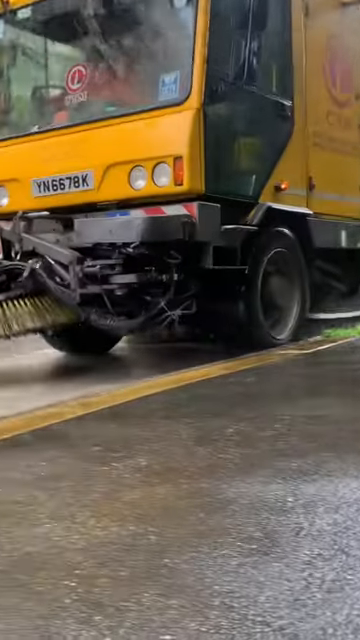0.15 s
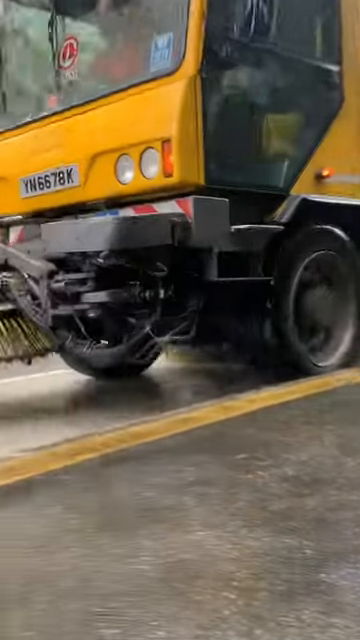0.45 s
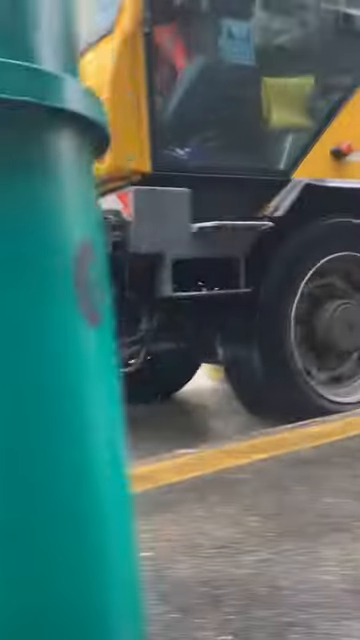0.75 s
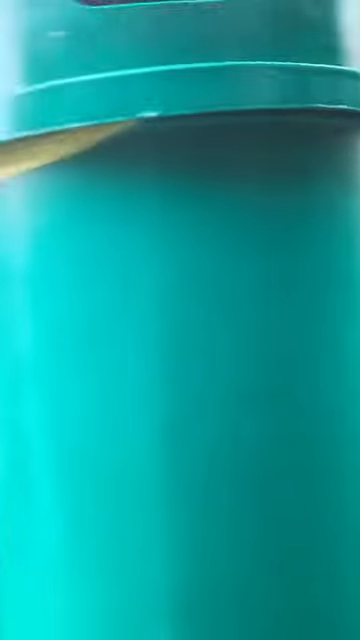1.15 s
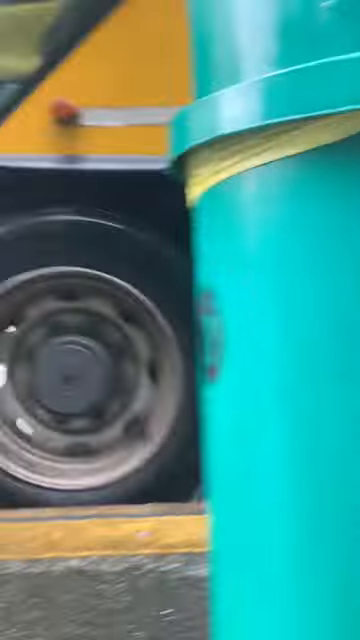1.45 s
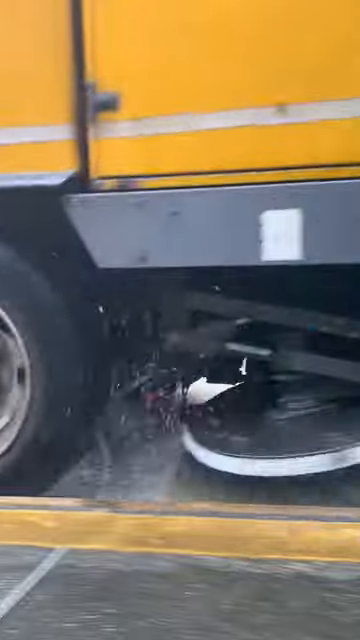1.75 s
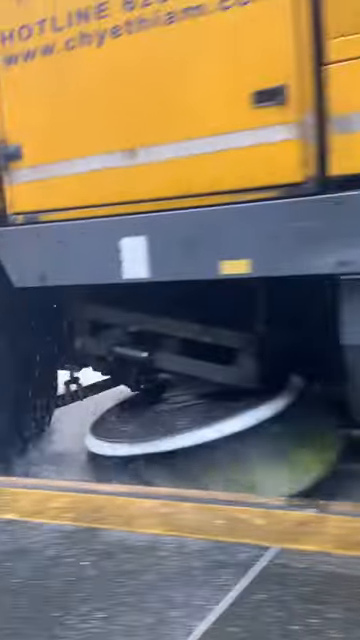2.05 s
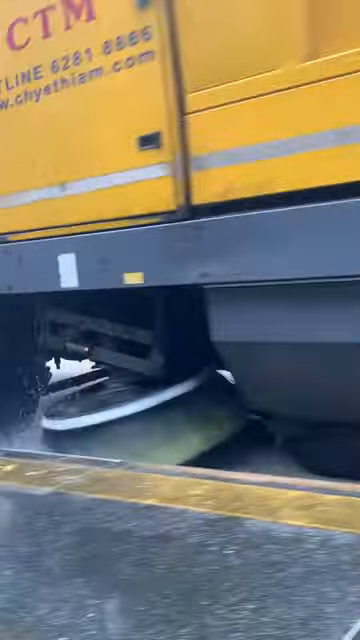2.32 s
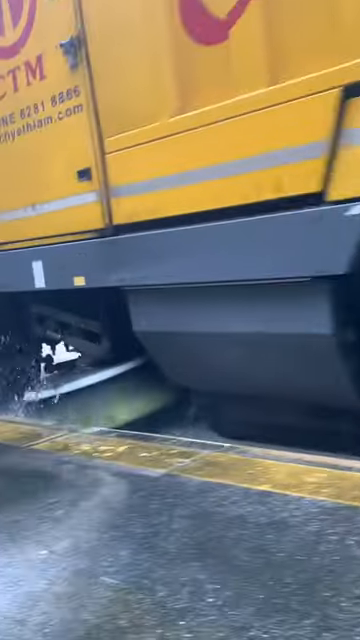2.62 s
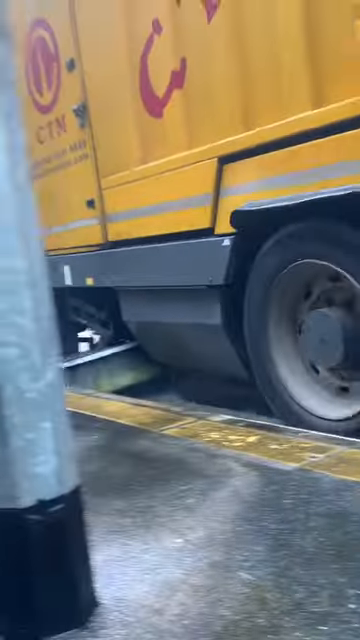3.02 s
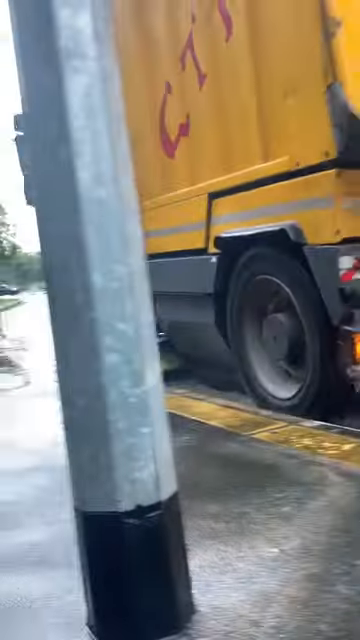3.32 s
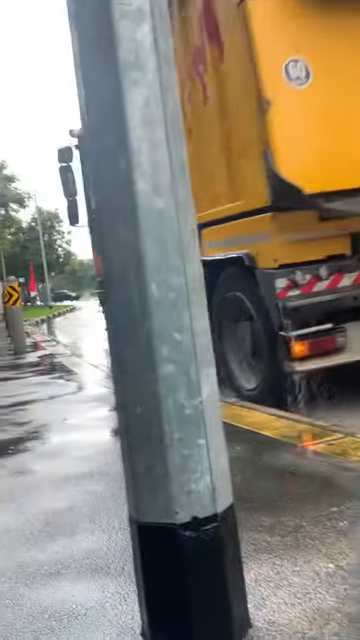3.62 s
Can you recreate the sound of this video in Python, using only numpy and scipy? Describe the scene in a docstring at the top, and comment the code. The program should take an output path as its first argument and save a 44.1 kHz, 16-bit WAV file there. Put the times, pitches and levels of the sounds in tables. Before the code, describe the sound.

A street sweeper truck rolls past on wet road, hissing brushes and spray over diesel drone.

```python
"""Passing street sweeper

A street sweeper truck rolls slowly past on a wet road, heard from the pavement in two channels.
Its six-cylinder diesel is a harmonic series on the cycle rate; the suction fan is a wavering tone, narrow bands
and broad flow noise; brushes and spray are dense ticks over smooth noise, filtered into treble bands.
A bin shades the treble for a moment and throws hiss back; then the truck draws away and its levels sink.
"""
import sys
import numpy as np
from scipy import signal
from scipy.fft import rfft, irfft, next_fast_len
from scipy.io import wavfile

SR = 44100
rng = np.random.default_rng(int(sys.argv[2]) if len(sys.argv) > 2 else 0)


def master_out(mix):
    """Clip the mix to full scale and print it as 16-bit PCM to the path in sys.argv[1]."""
    frames = np.transpose(np.atleast_2d(mix))
    ceiling = np.clip(frames, -1, 1)
    pcm = np.round(ceiling * 32767).astype(np.int16)
    wavfile.write(sys.argv[1], SR, pcm)


N = 166698   # samples

# Engine firing, sagging a little in pitch as the truck goes by:
# (time [s], firing rate [Hz], level of the firing tone [dB])
ENGINE_FIRING = [(0, 95.3, -34), (.4, 95.2, -34.5), (.75, 95.15, -37), (1.1, 95.05, -34), (1.4, 95, -32.5),
                 (1.75, 94.9, -33), (2.1, 94.8, -31.5), (2.7, 94.5, -33), (3.3, 94.3, -37),
                 (3.78, 94.3, -36.5)]
# Exhaust harmonics: (multiple of the cycle rate [-], level re the firing tone [dB], slow waver [dB])
EXHAUST_TONES = [(3, -29, 3.5), (4, -21.5, 6.5), (5, -33, 3), (6, 0.5, 1.0), (7, -15, 6), (8, -17.5, 4),
                 (9, -13.5, 3.5), (11, -17, 4.5), (13, -19.5, 2), (14, -15, 1), (15, -15, 2.5),
                 (18, -22, 7), (20, -18, 4.5), (22, -16.5, 2.5), (26, -28.5, 1.5), (33, -26, 1),
                 (36, -20.5, 3.5)]
# Harmonics that swell on their own: (multiple of the cycle rate [-])
SWELLING_MULTIPLES = (10, 12, 24)
# Tones that swell as the paths to the pavement change: (time [s], 10th multiple level [dB],
# 12th multiple level [dB], fan hum level [dB], 24th multiple level [dB])
TONE_SWELLS = [(0, -40, -31.5, -38, -49), (.15, -46, -38, -39, -43), (.3, -53, -33.5, -48, -49),
               (.42, -41, -39, -32, -38), (.6, -40, -42, -51, -46), (.8, -41, -41.5, -46, -56),
               (1.0, -46, -40, -54, -55), (1.2, -46, -46, -46, -49), (1.5, -47, -37.5, -42.5, -49),
               (1.7, -51, -39, -45, -40), (1.85, -54, -50, -35, -44), (2.0, -47, -52, -42.5, -41),
               (2.2, -42, -42, -42, -44), (2.4, -45, -41.5, -53.5, -49), (2.6, -40.5, -40.5, -51, -46),
               (2.8, -45, -42, -45.5, -54), (3.1, -41, -45, -60, -51), (3.35, -48, -40, -52, -49),
               (3.78, -49, -45, -54, -62)]
# Faint upper tones as narrow bands, before the passing gain; 760 Hz is the engine's 48th cycle multiple,
# broadened: (frequency [Hz], rms level [dB], width [Hz])
UPPER_NARROW_TONES = [(760, -53, 22), (1147, -55, 16)]
# Hollow band that slides in pitch: (time [s], centre frequency [Hz], level [dB])
HOLLOW_BAND = [(0, 1150, -47), (.65, 1130, -53), (.8, 1164, -36.5), (.95, 1270, -37.5), (1.1, 1383, -42),
               (1.25, 1410, -40), (1.35, 1420, -47), (2.9, 1250, -62), (3.15, 1195, -43), (3.35, 1130, -45),
               (3.55, 1170, -41), (3.78, 1160, -54)]
# Noise levels as the truck passes: (time [s], body rumble [dB], suction roar [dB], intake whoosh [dB],
# duct ring [dB], brush hiss [dB], spray [dB], fine mist [dB])
PASSING_LEVELS = [(0, -32, -30, -31.2, -30, -28, -24.5, -24),
                  (0.25, -31, -30.2, -30, -31.5, -26, -22, -23.5),
                  (0.55, -30, -29, -31.5, -34, -28, -22.5, -22.5),
                  (0.68, -34, -31, -33, -37, -30.5, -26, -27),
                  (0.85, -33.5, -30.5, -34.5, -35.5, -31.5, -26.5, -28.6),
                  (1.05, -32.5, -30.5, -32, -34, -29.5, -25, -25.5),
                  (1.25, -35.5, -32, -36, -35, -32, -28, -28.5),
                  (1.36, -31, -34.5, -39, -39, -34.5, -31.5, -32),
                  (1.43, -35.5, -35.5, -37, -37, -33.5, -31, -35),
                  (1.52, -34, -32.5, -35, -34.5, -29.5, -28, -30),
                  (1.62, -31.5, -31.5, -34.5, -34.5, -26, -24, -23.5),
                  (1.8, -34, -31, -33.5, -36, -28, -25.5, -25),
                  (2.05, -34, -31.5, -33.5, -35, -29.5, -27.5, -28),
                  (2.2, -34, -33, -36.5, -37, -29.5, -28.5, -28.5),
                  (2.45, -37, -33.5, -34, -35, -31.5, -27.5, -29),
                  (2.7, -38, -34, -36, -33, -31, -29.5, -31.5),
                  (2.95, -35.5, -36, -39, -33, -34, -30, -33.4),
                  (3.15, -37, -37.5, -39.5, -38.5, -36, -32, -37),
                  (3.4, -36, -37.5, -39.5, -38.5, -36.5, -33.5, -35),
                  (3.6, -40, -36.5, -46, -38, -36.5, -37.5, -37),
                  (3.78, -37.5, -38.5, -43.5, -43.5, -39, -37.2, -42)]
# Body panels' drone: (time [s], level [dB])
PANEL_LEVEL = [(0, -37), (.15, -34), (.45, -36), (.62, -35.5), (.8, -38), (1.15, -38.5), (1.45, -38.5),
               (1.7, -34.5), (1.95, -35.5), (2.2, -37), (2.5, -39.5), (2.8, -42), (3.15, -43.5),
               (3.4, -44.5), (3.6, -43.5), (3.78, -48)]
# Relative spectra of the noises, each: (frequency [Hz], spectral density [dB per Hz])
ROAR_SPECTRUM = [(700, -12), (950, -13), (1100, -4), (1300, -2), (1700, 0.5), (2100, -0.5), (2600, -8),
                 (3300, -16.5)]
WHOOSH_SPECTRUM = [(1900, -12), (2350, -0.5), (2700, 1.5), (3050, -0.5), (3350, 3.5), (3900, -60)]
DUCT_SPECTRUM = [(3000, -54), (3500, -0.5), (3950, 2.5), (4300, 0), (4700, -14), (5500, -91)]
HISS_SPECTRUM = [(4000, -10), (4650, -3), (5200, -4), (6200, 1.5), (6800, -0.5), (7300, 0.5), (8200, 0),
                 (9200, -9.5)]
SPRAY_SPECTRUM = [(7800, -17), (8500, -3.5), (9300, 0), (10300, 1.5), (10900, 2), (11500, 1), (12500, -18)]
MIST_SPECTRUM = [(11000, -21), (11900, -2), (13000, -2.5), (14000, -2), (15000, -8.5), (16000, -1)]
DISC_SPECTRUM = [(1150, -19), (1450, -4), (1650, -2), (1850, -5), (2300, -25)]
RUMBLE_SPECTRUM = [(18, -32), (25, -20), (35, -14), (48, -0.5), (110, -2), (230, -2.5), (400, -5),
                   (520, -8.5), (700, -22)]
PANEL_SPECTRUM = [(420, -14), (560, -1.5), (750, -1.5), (950, -3), (1150, -6.5), (1500, -22)]
THROWN_SPECTRUM = [(4300, -24), (4700, 0), (5600, 4), (6000, -18)]
# Bearing of the intake: (time [s], extra phase of the right channel [half turns])
INTAKE_BEARING = [(0, 0.12), (.7, 0.086), (1.4, -0.21), (1.7, -0.44), (2.3, -.55), (2.8, -0.0034),
                  (3.78, -0.092)]
# Left-right likeness by frequency: (frequency [Hz], likeness 0-1 [-], phase of the right channel [half turns])
CHANNEL_LIKENESS = [(20, .995, 0.0), (350, .985, 0.0), (700, .84, -.03), (1100, .7, .03), (1500, .9, .04),
                    (1900, .97, 0.0), (2500, .45, -.3), (3200, .45, -.6), (4300, .35, -.4),
                    (4800, .9, -.97), (5000, .98, -1), (5450, .96, -1), (5900, .68, -1.3),
                    (7200, .78, -1.8), (7700, .998, -2), (8950, .998, -2), (9700, .8, -2.3),
                    (11200, .85, -2.75), (11800, .998, -3), (13200, .998, -3), (14000, .72, -3.4),
                    (14800, .72, -3.75), (15250, .998, -4), (17000, .998, -4)]
# Balance of the channels: (frequency [Hz], left minus right level [dB])
CHANNEL_TILT = [(60, -2), (110, -1.0), (200, -2.5), (380, -1.5), (700, 0.5), (1290, 1), (2380, -1),
                (4400, -0.5), (8120, 0.0), (15000, -0.5)]

CYLINDERS = 6   # firings per engine cycle
UPPER_FROM = 12   # exhaust tones in EXHAUST_TONES from this multiple up follow the body rumble's level
TONE_WAVER_HZ = 1.94
FIRING_ROUGH, FIRING_ROUGH_HZ = .04, 9   # unevenness of the firings: share, speed
FAN_HZ, FAN_WANDER_HZ = 294.5, 4   # mean pitch, spread of its wander
HOLLOW_WIDTH_HZ = 120
BRISTLES_PER_S, BRISTLE_SPREAD_DB, BRISTLE_SHARE = 9000, 1.5, .32   # share of the power in ticks
SPURT_DB, SPURT_HZ = .35, 14   # spread and speed of the water's spurts
DISC_DB, DISC_THROB_DB = -38.5, 5.5   # mean level and swing either way
DISC_TURNS_HZ, DISC_PEAK_S = 4.34, 1.93
DISC_NEAR_S, DISC_NEAR_WIDTH_S = 2.07, .49
THROWN_DB, THROWN_S, THROWN_WIDTH_S = -41, 1.054, .16
CUTOFF_HZ = 15740


def engine(near_db):
    """Harmonic series: uneven cylinders sound multiples of the cycle rate, wavering as the paths change."""
    firing_hz, firing_db = in_time(ENGINE_FIRING)
    tenth_db, twelfth_db, _, top_db = in_time(TONE_SWELLS)
    cycles = np.cumsum(firing_hz) / SR / CYLINDERS

    def harmonic(multiple, level_db):
        return np.sqrt(2) * amp(level_db) * np.sin(2 * np.pi * (multiple * cycles + rng.random()))

    tones = np.zeros(N)
    for multiple, level_db in zip(SWELLING_MULTIPLES, (tenth_db, twelfth_db, top_db)):
        tones += harmonic(multiple, level_db)
    for multiple, relative_db, waver_db in EXHAUST_TONES:
        base_db = firing_db if multiple < UPPER_FROM else firing_db.mean() + near_db
        tones += harmonic(multiple, base_db + relative_db + waver_db * drift(TONE_WAVER_HZ))
    return tones * (1 + FIRING_ROUGH * drift(FIRING_ROUGH_HZ))


def fan_hum(near_db):
    """Frequency and amplitude modulation broaden the fan's main tone; narrow noise bands lie above it."""
    pitch_hz = FAN_HZ + FAN_WANDER_HZ * drift(3.18)
    wobble = 1 + .3 * drift(6.0)
    main_db = in_time(TONE_SWELLS)[2]
    main = amp(main_db) * np.sqrt(2) * wobble * np.sin(2 * np.pi * np.cumsum(pitch_hz) / SR)
    upper = sum(amp(db) * narrow(hz, width_hz) for hz, db, width_hz in UPPER_NARROW_TONES)
    hollow_hz, hollow_db = in_time(HOLLOW_BAND)
    return main + amp(near_db) * upper + amp(hollow_db) * narrow(hollow_hz, HOLLOW_WIDTH_HZ)


def suction_roar(level_db):
    """Flow noise: chance pressure fluctuations form a broad band that swells unevenly."""
    return amp(level_db) * coloured(white(), ROAR_SPECTRUM, slow_db=.1, fast_db=2.0, count=7)


def intake(whoosh_db, duct_db):
    """Phase rotation: whoosh and duct ring take a moving extra phase in the right channel."""
    whoosh = amp(whoosh_db) * coloured(white(), WHOOSH_SPECTRUM, slow_db=1.8, fast_db=2.5, count=8)
    duct = amp(duct_db) * coloured(white(), DUCT_SPECTRUM, slow_db=1.0, fast_db=.5, count=8)
    left, right = stereo(*(whoosh + duct))
    analytic = signal.hilbert(right, next_fast_len(N))[:N]
    turn = np.exp(1j * np.pi * in_time(INTAKE_BEARING)[0])
    return np.array([left, np.real(analytic * turn)])


def brush_and_spray(hiss_db, spray_db, mist_db):
    """Shot noise: impacts of bristles and droplets fill three treble bands that share the water's spurts."""
    spurt = amp(SPURT_DB * drift(SPURT_HZ))
    hiss = amp(hiss_db) * coloured(bristles(), HISS_SPECTRUM, slow_db=-.2, fast_db=1.98, count=9)
    spray = amp(spray_db) * coloured(bristles(), SPRAY_SPECTRUM, slow_db=.6, fast_db=.4, count=10)
    mist = amp(mist_db) * coloured(bristles(), MIST_SPECTRUM, slow_db=.5, fast_db=.4, count=10)
    return spurt * (hiss + spray + mist)


def bristles():
    """Random superposition: dense ticks of either sign and uneven size over smooth spray noise."""
    size_db = BRISTLE_SPREAD_DB * np.minimum(rng.exponential(1, (2, N)), 5)
    sizes = amp(size_db) * rng.choice([-1, 1], (2, N))
    ticks = rms_one(sizes * (rng.random((2, N)) < BRISTLES_PER_S / SR))
    return np.sqrt(BRISTLE_SHARE) * ticks + np.sqrt(1 - BRISTLE_SHARE) * white()


def brush_disc():
    """Periodic modulation: the side brush's disc rings in the scrub once a turn while it is near."""
    t = np.arange(N) / SR
    throb_db = DISC_THROB_DB * np.cos(2 * np.pi * DISC_TURNS_HZ * (t - DISC_PEAK_S))
    level = amp(DISC_DB + throb_db) * flat_topped(DISC_NEAR_S, DISC_NEAR_WIDTH_S)
    return level * coloured(bristles(), DISC_SPECTRUM, slow_db=1.0, fast_db=2.5, count=6)


def body(rumble_db):
    """Structural radiation: low body rumble and the panels' drone, as two bands of filtered noise."""
    rumble = amp(rumble_db) * coloured(white(), RUMBLE_SPECTRUM, slow_db=.5, fast_db=2.3, count=3)
    panel_db = in_time(PANEL_LEVEL)[0]
    return rumble + amp(panel_db) * coloured(white(), PANEL_SPECTRUM, slow_db=2.0, fast_db=3.0, count=6)


def bin_reflection():
    """Reflection: hiss thrown back by the bin swells briefly, alike in both channels."""
    hiss = coloured(white(), THROWN_SPECTRUM, slow_db=1.0, fast_db=2.5, count=6)[0]
    return amp(THROWN_DB) * flat_topped(THROWN_S, THROWN_WIDTH_S) * hiss


def stereo(direct, diffuse):
    """Partial coherence: the right channel is the left's sound turned in phase, plus an unrelated part."""
    size = next_fast_len(N + 4096)
    hz = np.arange(size // 2 + 1) * SR / size + 1e-3
    at, likeness, half_turns = np.transpose(CHANNEL_LIKENESS)
    alike = np.clip(np.interp(hz, at, likeness), 0, 1)
    turn = np.exp(1j * np.pi * np.interp(hz, at, half_turns))
    tilt_hz, tilt_db = np.transpose(CHANNEL_TILT)
    lean = amp(np.interp(np.log(hz), np.log(tilt_hz), tilt_db) / 2)   # half the difference to each channel
    shared, unrelated = rfft(direct, size), rfft(diffuse, size)
    left = shared * lean
    right = (alike * shared + np.sqrt(1 - alike ** 2) * unrelated) * turn / lean
    return irfft([left, right], size)[:, :N]


def coloured(raw, spectrum, slow_db, fast_db, count):
    """Spectral shaping: filter a pair of sounds; count bands an octave swell independently; rms 1."""
    size = next_fast_len(N, True)
    hz = np.arange(size // 2 + 1) * SR / size + 1e-3
    at, db = np.transpose(spectrum)
    gain = amp(np.interp(np.log(hz), np.log(at), db, left=-99, right=-99))
    shaped = rfft(raw, size) * gain
    place = count * np.log2(hz / at[0])
    out = np.zeros((2, N))
    for k in range(int(count * np.log2(at[-1] / at[0])) + 2):
        overlap = np.clip(1 - abs(place - k), 0, 1)   # triangular bands that sum to one
        band = irfft(shaped * overlap, size)[:, :N]
        out += band * amp(slow_db * drift(1.63) + fast_db * drift(18.3))
    return rms_one(out)


def narrow(hz, width_hz):
    """Quadrature modulation: slow noise pairs on a carrier make a narrow band around its pitch; rms 1."""
    r = np.exp(-np.pi * width_hz / SR)
    slow = signal.lfilter([1], [1, -2 * r, r * r], rng.standard_normal((2, N + SR)))[:, SR:]
    phase = 2 * np.pi * np.cumsum(hz + np.zeros(N)) / SR
    return rms_one(slow[0] * np.cos(phase) + slow[1] * np.sin(phase))


def drift(rate_hz):
    """Low-pass noise: a slow chance modulation of spread 1, made at every 40th sample."""
    r = np.exp(-80 * np.pi * rate_hz / SR)
    slow = signal.lfilter([1], [1, -2 * r, r * r], rng.standard_normal(N // 40 + 2002))[2000:]
    return np.interp(np.arange(N) / 40, np.arange(len(slow)), rms_one(slow))


def white():
    """White noise: two independent signals of equal power at every frequency."""
    return rng.standard_normal((2, N))


def flat_topped(centre_s, width_s):
    """Envelope: a smooth rise and fall with a broad top."""
    return np.exp(-((np.arange(N) / SR - centre_s) / width_s) ** 4)


def in_time(rows):
    """Linear interpolation: the columns of a table as curves over the samples."""
    s, *columns = np.transpose(rows)
    return [np.interp(np.arange(N) / SR, s, column) for column in columns]


def amp(db):
    """Decibel law: 20 dB is a tenfold amplitude."""
    return 10 ** (np.asarray(db) / 20)


def rms_one(x):
    """Normalization: scale to a root mean square of 1."""
    return x / np.sqrt(np.mean(x ** 2) + 1e-20)


def scene():
    """Superposition: the truck's sources add in the two channels."""
    rumble_db, roar_db, whoosh_db, duct_db, hiss_db, spray_db, mist_db = in_time(PASSING_LEVELS)
    near_db = rumble_db - rumble_db.mean()
    tones = engine(near_db) + fan_hum(near_db)
    direct, diffuse = (suction_roar(roar_db) + brush_and_spray(hiss_db, spray_db, mist_db)
                       + brush_disc() + body(rumble_db))
    return stereo(tones + direct, diffuse) + intake(whoosh_db, duct_db) + bin_reflection()


def record(dry):
    """Band limiting: a steep elliptic low-pass cuts the top."""
    return signal.sosfilt(signal.ellip(14, .3, 70, CUTOFF_HZ, fs=SR, output="sos"), dry)


dry = scene()
out = record(dry)
master_out(out)
```